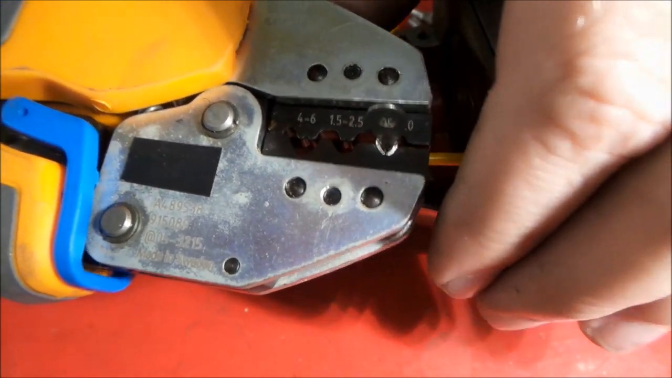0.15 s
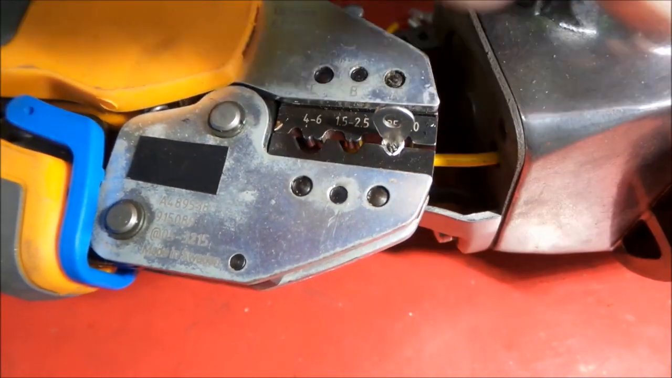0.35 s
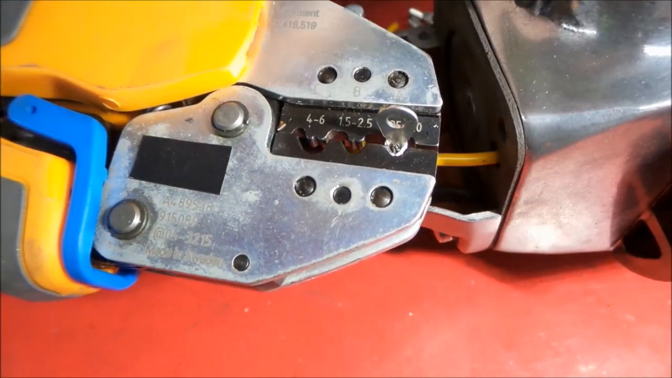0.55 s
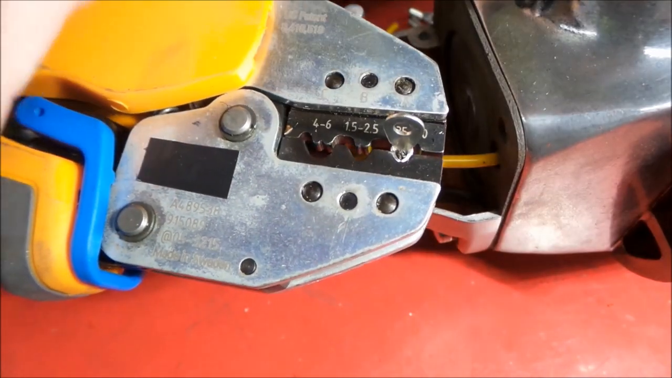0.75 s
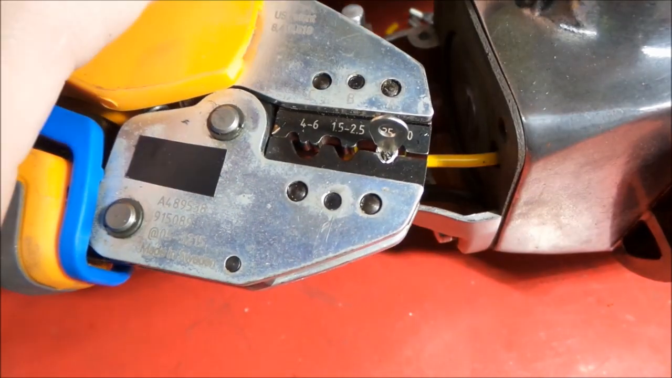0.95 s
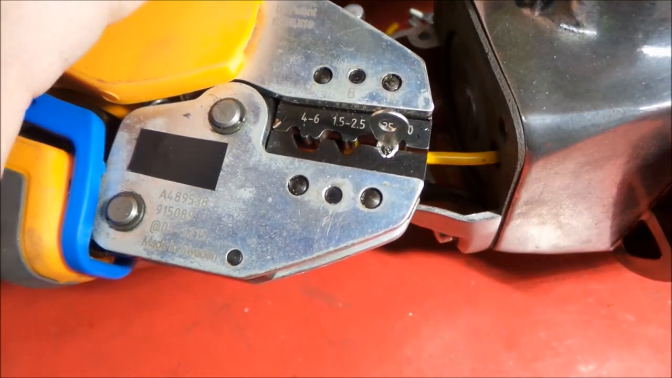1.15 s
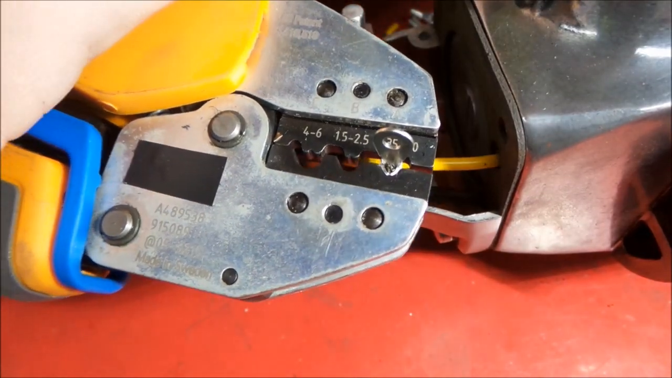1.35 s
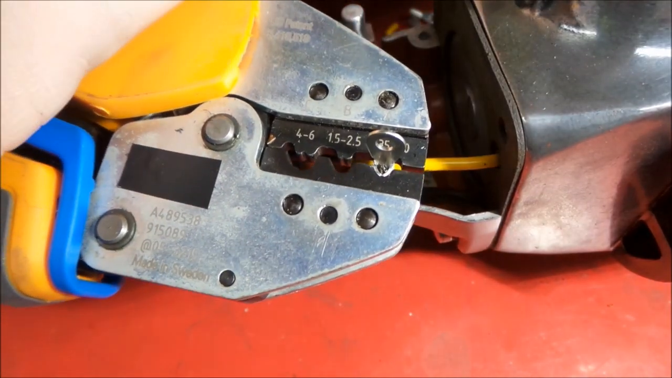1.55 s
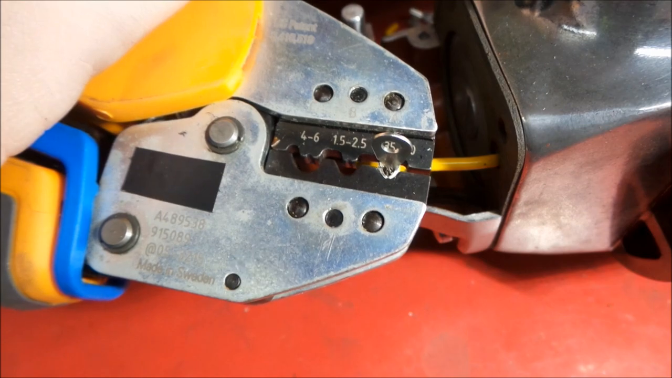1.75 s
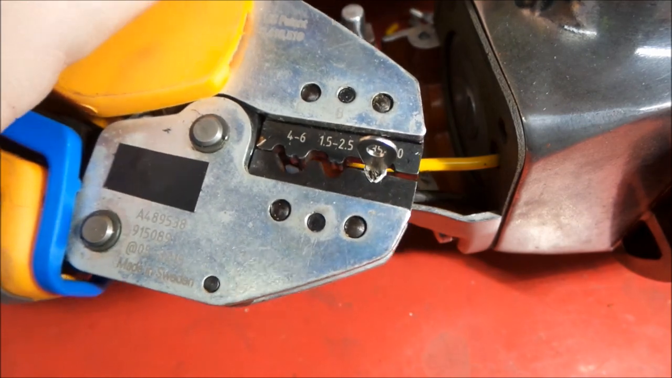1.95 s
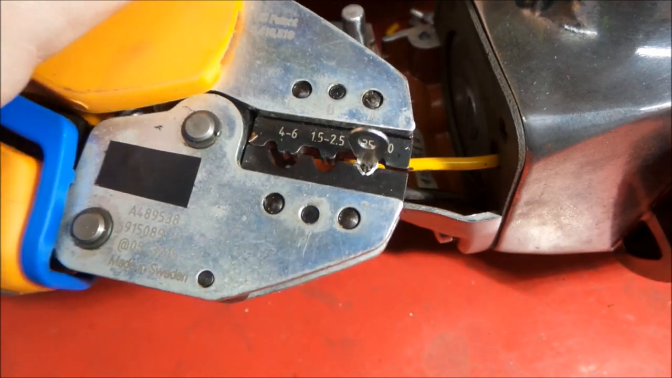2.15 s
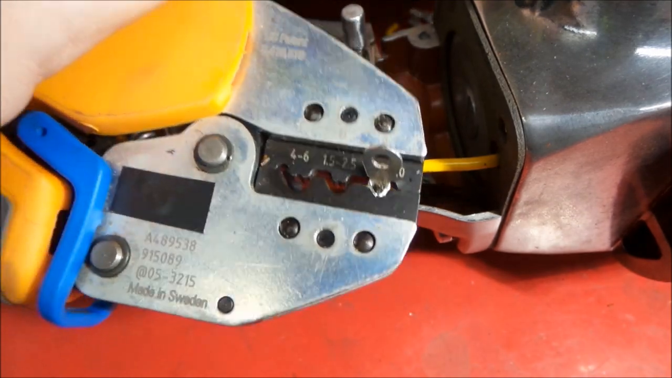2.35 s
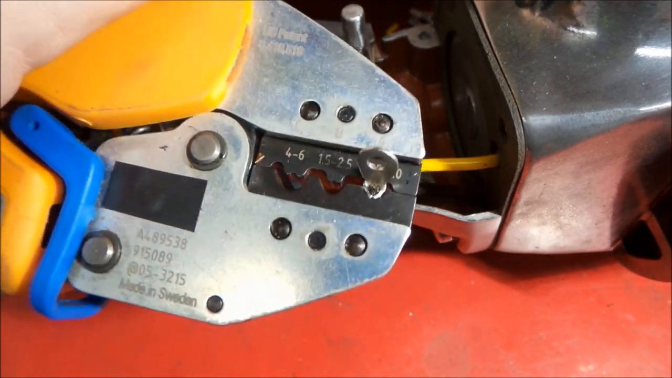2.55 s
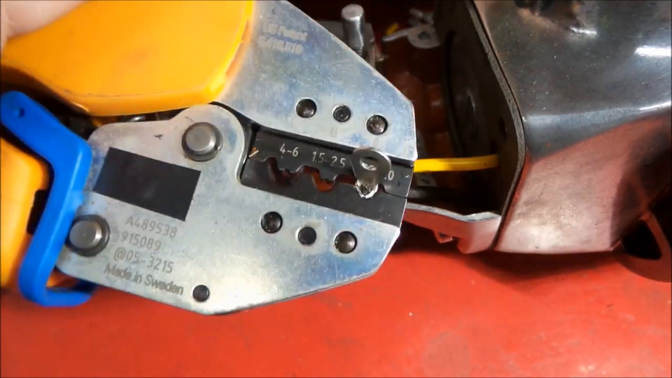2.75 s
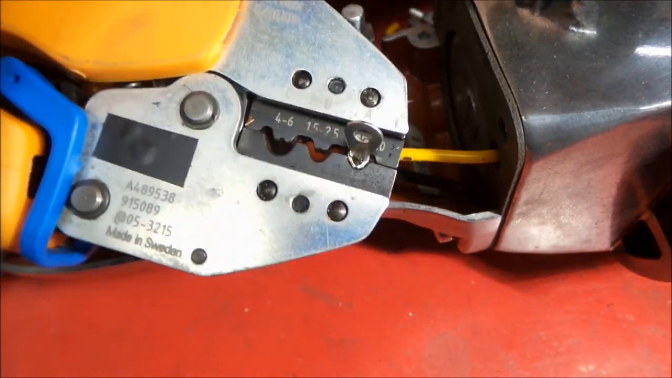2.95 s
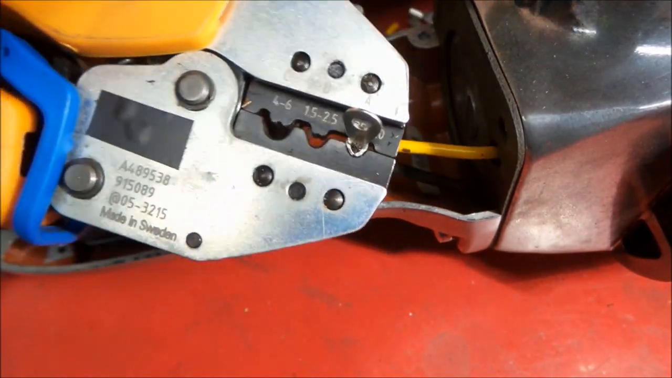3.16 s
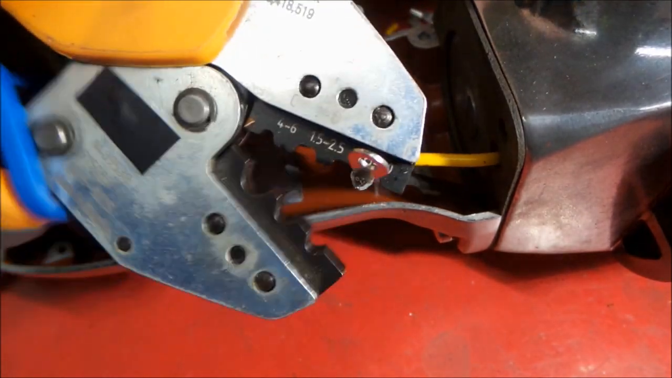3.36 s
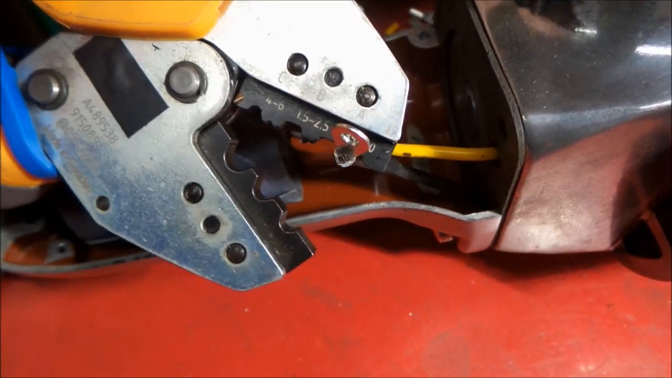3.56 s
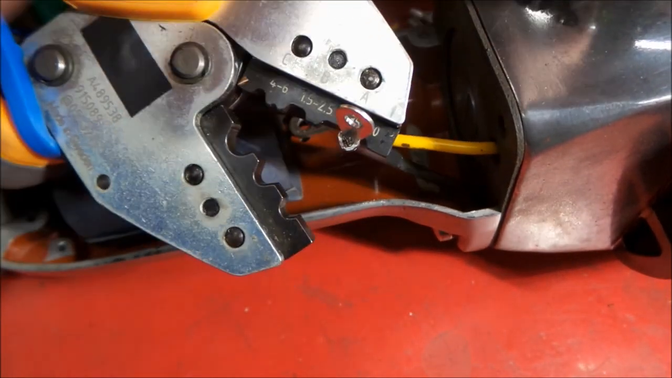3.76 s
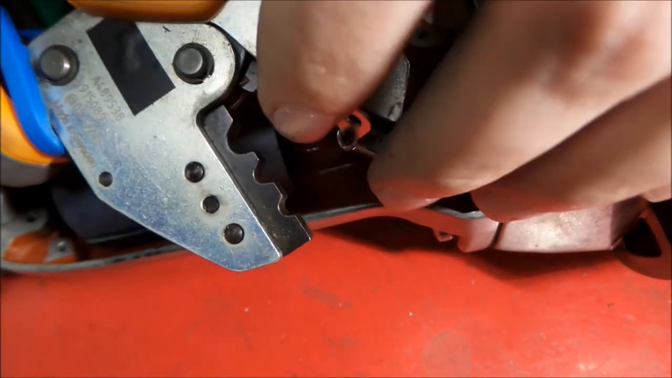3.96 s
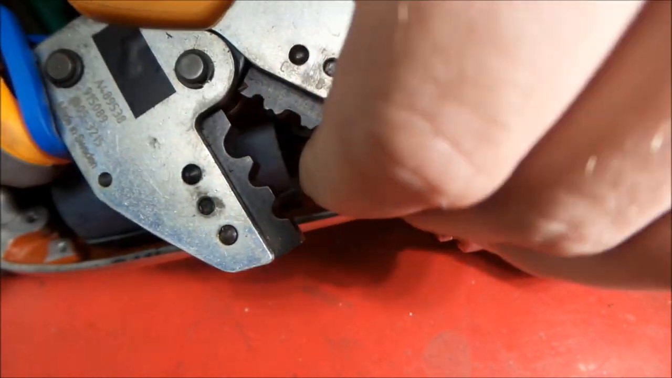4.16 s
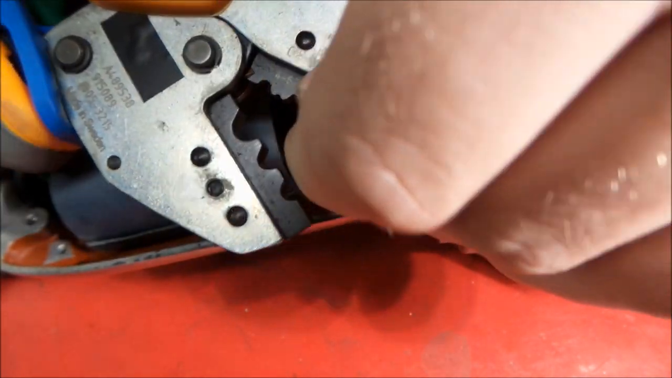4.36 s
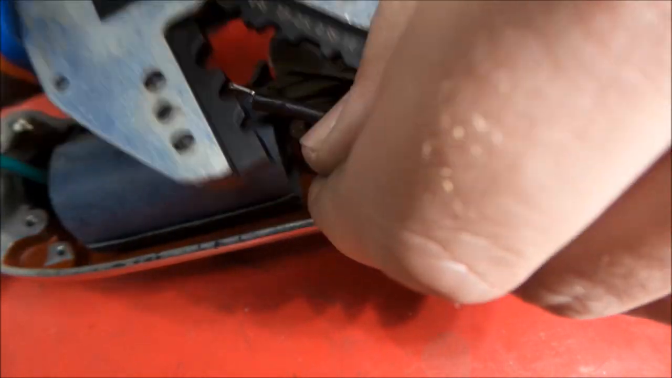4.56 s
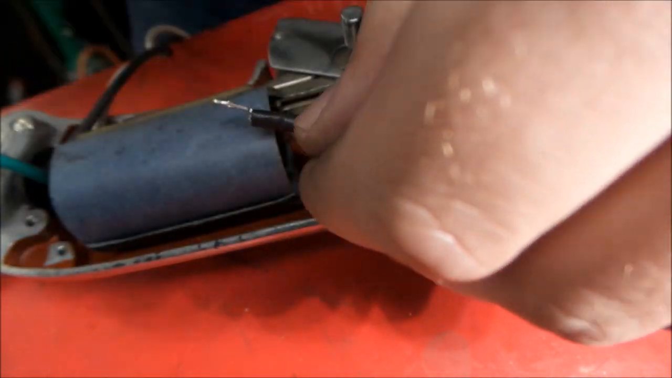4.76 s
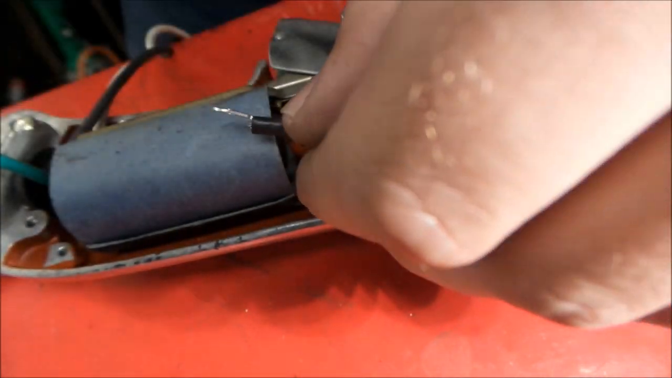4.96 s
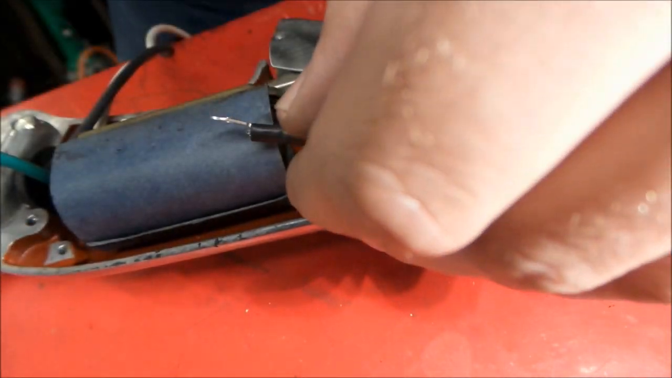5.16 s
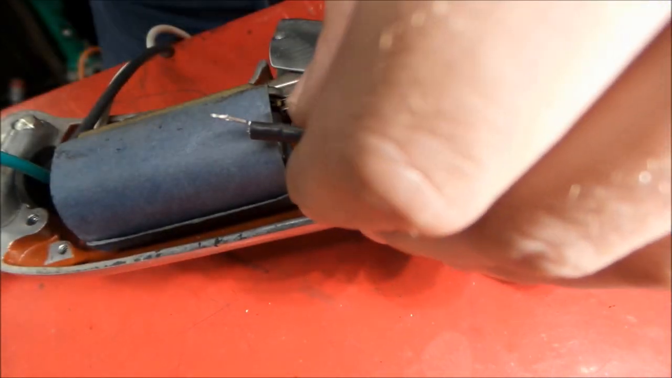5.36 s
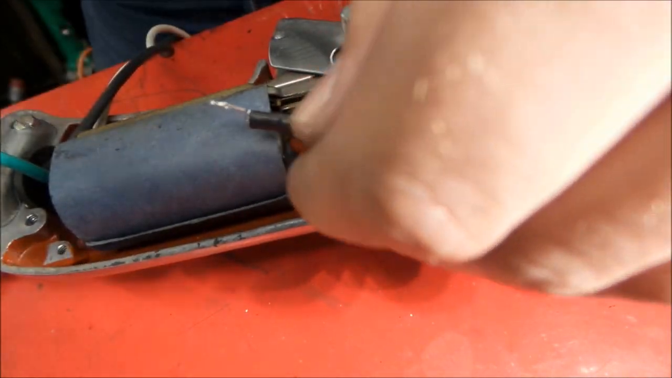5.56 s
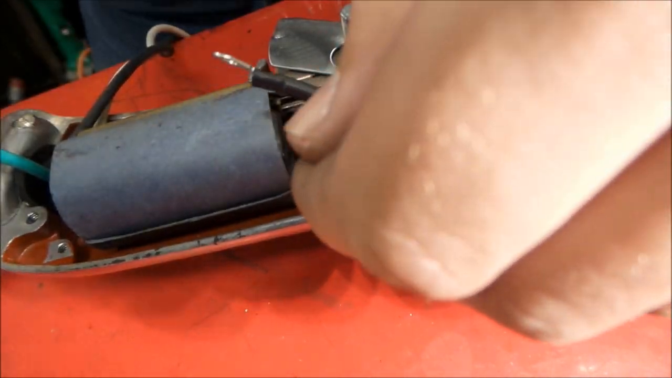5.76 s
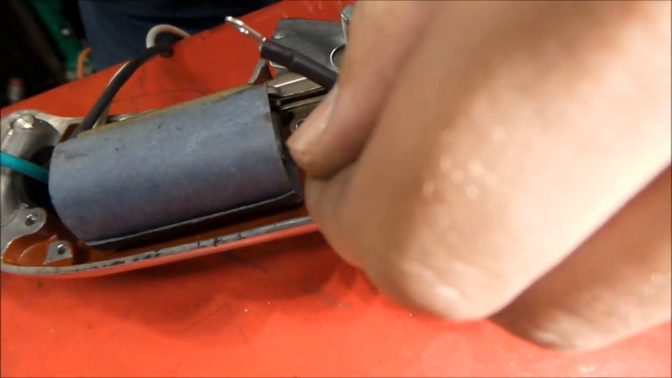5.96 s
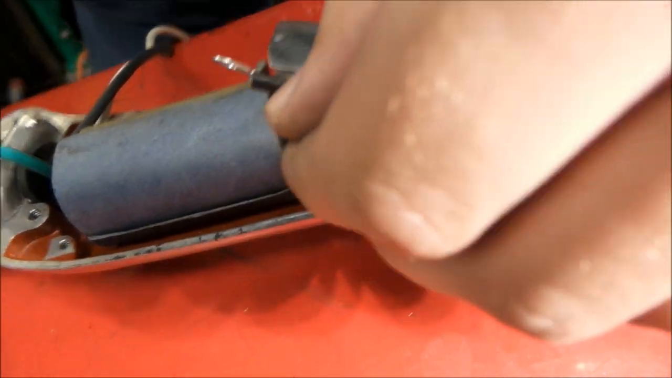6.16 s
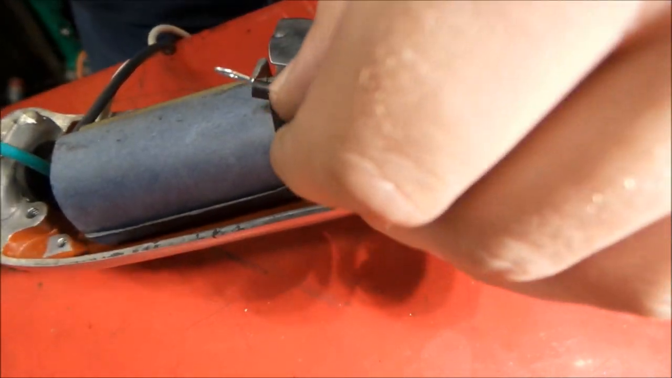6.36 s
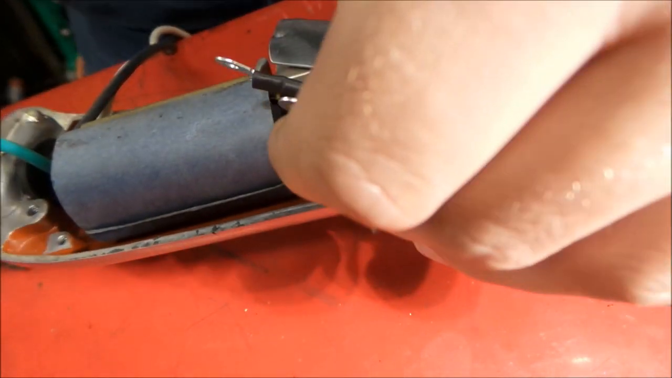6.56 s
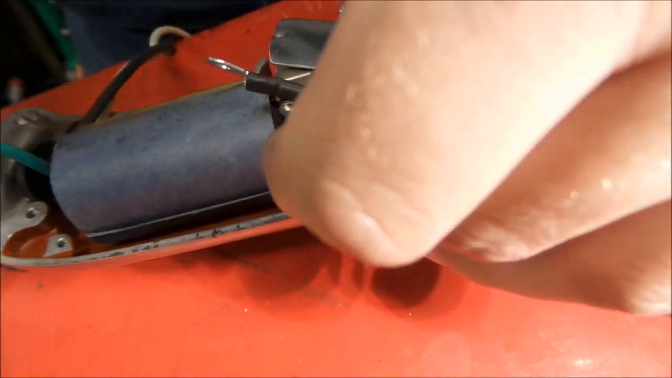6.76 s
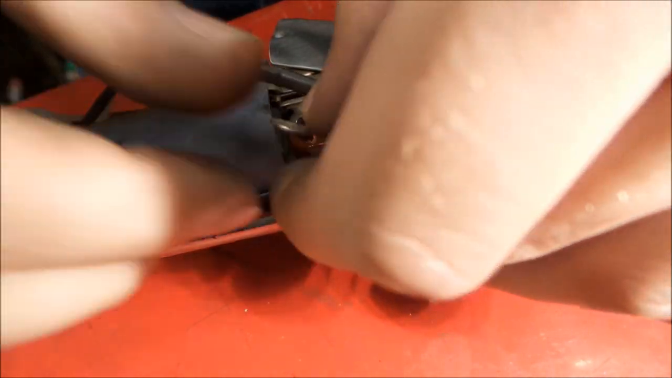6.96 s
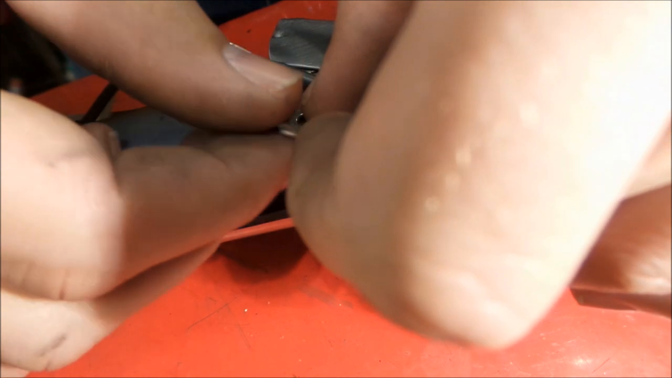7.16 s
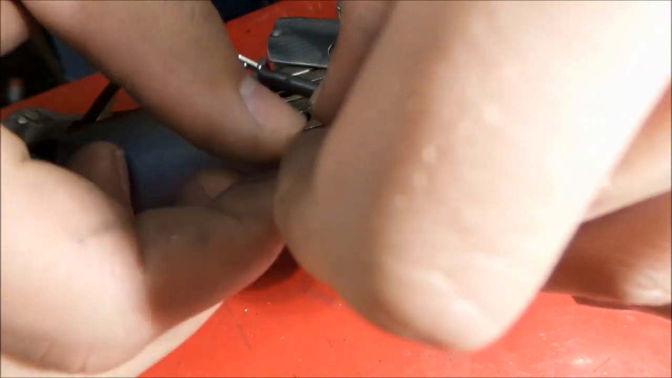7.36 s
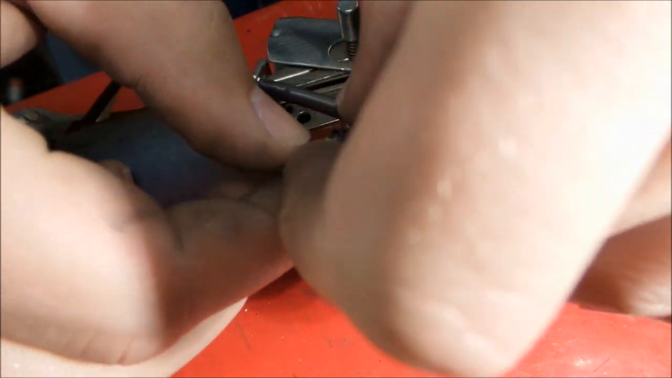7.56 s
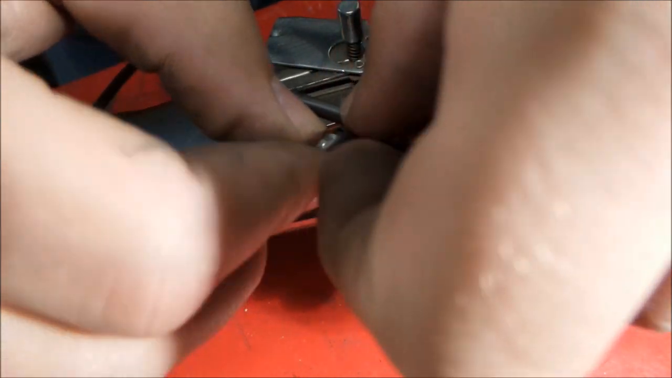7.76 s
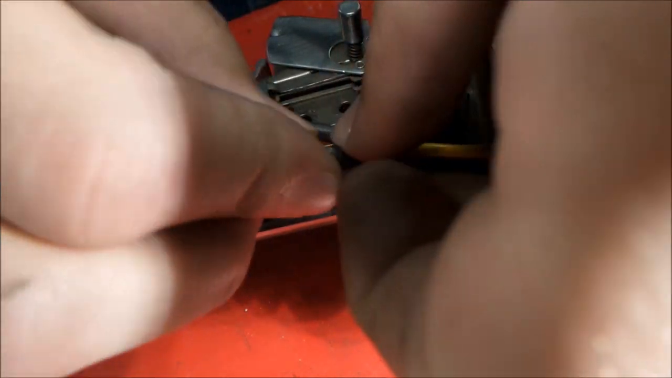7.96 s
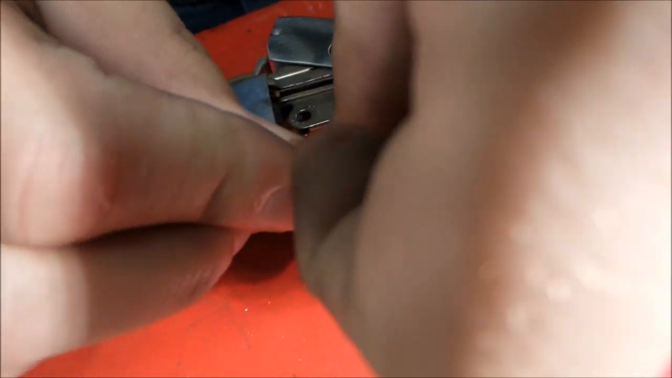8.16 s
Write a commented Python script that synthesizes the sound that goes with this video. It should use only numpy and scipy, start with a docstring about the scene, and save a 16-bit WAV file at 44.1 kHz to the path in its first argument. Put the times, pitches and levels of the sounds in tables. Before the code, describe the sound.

Very close in a small workshop with a faint low hum, a crimping tool gives one sharp snap, then soft skin rubs and tiny ticks. Two loud ratchet snaps follow, and soon the jaws spring open in a rapid run of clicks ending in a metallic clack. Fingers then slide along wire, the tool rattles briefly, a metal housing thumps low, and a connector clinks faintly.

```python
"""A ratcheting crimping tool is squeezed shut on a metal connector, close by, in a small workshop.
The pawl snaps over its last teeth, then the jaws spring open with a quick run of clicks and a clack.
Fingers work the wire into a metal housing, which is bumped and thumps. A machine hums faintly.
Impacts are shaped noise bursts that excite decaying modes and room reflections;
friction is grainy noise and ringing slips; hum, squeals and pips are sine tones."""
import sys
import numpy as np
from scipy import signal
from scipy.fft import rfft, irfft, next_fast_len
from scipy.io import wavfile
from scipy.ndimage import uniform_filter1d, map_coordinates

SR = 44100
rng = np.random.default_rng(int(sys.argv[2]) if len(sys.argv) > 2 else 0)


def master_out(mix):
    """Clip the mix to full scale and print it as 16-bit PCM to the path in sys.argv[1]."""
    frames = np.transpose(np.atleast_2d(mix))
    ceiling = np.clip(frames, -1, 1)
    pcm = np.round(ceiling * 32767).astype(np.int16)
    wavfile.write(sys.argv[1], SR, pcm)


N = 362662  # samples in the scene


def gain_of(db):
    """A level difference in decibels is 20 times the logarithm of an amplitude ratio."""
    return 10 ** (np.asarray(db) / 20)


def evened(x):
    """Normalises the mean power: rms 1."""
    return x / np.sqrt(np.mean(x ** 2) + 1e-20)


def unit(x):
    """Normalises the total energy: sum of squares 1."""
    return x / np.sqrt(np.sum(x ** 2) + 1e-20)


def read(points, hz):
    """Interpolates a spectrum along a logarithmic frequency axis."""
    f, value = np.transpose(points)
    return np.interp(np.log(hz + 1), np.log(f + 1), value)


def add(mix, s, sound):
    """Linear superposition: a sound joins the mix at time s."""
    part = mix[round(s * SR):][:len(sound)]
    part += sound[:len(part)]


def plateau(start, end, attack, release):
    """A trapezoidal envelope: rises from 0 to 1, holds, and falls back."""
    t = np.arange(N) / SR
    return np.clip(np.minimum((t - start) / attack, (end - t) / release), 0, 1)


def noise(colour):
    """Steady coloured noise: a random spectrum weighted by a frequency response, at rms 1."""
    size = next_fast_len(N)
    spectrum = rfft(rng.standard_normal(size))
    weight = gain_of(read(colour, np.fft.rfftfreq(size, 1 / SR)))
    return evened(irfft(spectrum * weight, size)[:N])


def workshop(waver=0.13):
    """Discrete hum lines, phase-modulated in proportion to frequency, over broadband room noise."""
    # air of the workshop: f/Hz, level/dB
    air = [(20, -20), (85, -11), (130, -5.5), (190, 1), (235, 0), (275, -3.5), (360, -5.5), (430, -11),
           (900, -17.5), (1070, -14), (1250, -20), (3500, -28.5), (15500, -32.5), (16200, -55)]
    # hum of a machine: f/Hz, rms level/dB, before the dip
    hum = [(57.5, -60.5), (115, -69), (172.5, -61.5), (230, -69.5), (345, -64.5)]
    t = np.arange(N) / SR
    out = gain_of(-55.5) * noise(air)
    for hz, db in hum:
        drift = np.interp(t, np.linspace(0, t[-1], 40), rng.standard_normal(40))
        phase = 2 * np.pi * (hz * t + rng.random()) + waver * drift * hz / hum[0][0]
        out += gain_of(db) * np.sqrt(2) * np.sin(phase)
    # the background sinks by 5.5 dB for about a second around and after the clack
    dip = plateau(3.43, 4.68, attack=0.035, release=0.35)
    return out * gain_of(-5.5 * dip)


def impulse(colour, tilt, size=4096):
    """A minimum-phase pulse: the Hilbert transform of the log gain supplies the causal phase."""
    hz = abs(np.fft.fftfreq(size, 1 / SR))
    octaves = np.log2(np.maximum(hz, 200) / 1000)  # from 1 kHz; the tilt is held below 200 Hz
    log_gain = np.log(gain_of(read(colour, hz) + tilt * octaves))
    return np.fft.ifft(np.exp(np.conj(signal.hilbert(log_gain)))).real[:size // 2]


def chatter(decay, size=2048):
    """Micro-impacts: a first touch and a dying random flurry, whitened to an even spectrum."""
    t = np.arange(size) / SR
    flurry = unit(rng.standard_normal(size) * np.exp(-t / decay))
    flurry[0] += .25  # the first touch
    z = rfft(flurry)
    smooth_power = uniform_filter1d(abs(z) ** 2, size=41)
    return irfft(z / np.sqrt(smooth_power + 1e-12))[:size * 3 // 4]


def room(x, build_s=0.02128, early=0.62):
    """Reverberation: diffuse reflections thicken at first, while each band decays at its own rate."""
    # reverberation time of the room: f/Hz, t60/s
    room_t60 = [(150, 0.19), (1000, 0.23), (4000, 0.21), (9000, .21), (15000, 0.12)]
    hz, t, z = signal.stft(rng.standard_normal(len(x)), SR, nperseg=256)
    decay = gain_of(-60 * t / read(room_t60, hz)[:, None])
    tail = signal.istft(z * decay, SR, nperseg=256)[1]
    t = np.arange(len(tail)) / SR
    density = np.minimum(early + (1 - early) * t / build_s, 1)
    tail *= density * (t > .002)  # no reflection in the first 2 ms
    return signal.fftconvolve(x, unit(tail))[:len(x)]


def blow(db, decay, tilt, ring_db=0, colour=(), modes=(), wet_db=-12):
    """Modal impact: contact noise, the modes it excites (if any) and its reflections."""
    t = np.arange(SR // 5) / SR
    contact = np.zeros(len(t))
    add(contact, 0, unit(signal.fftconvolve(chatter(decay), impulse(colour, tilt))))
    ring = np.zeros(len(t))
    for hz, mode_db, t60 in modes:
        level = mode_db + tilt * np.log2(hz) - 60 * t / t60
        ring += gain_of(level) * np.cos(2 * np.pi * hz * t)
    ring *= 1 - np.exp(-2 * t / decay)  # the ring builds while the parts touch
    sound = contact + gain_of(ring_db) * unit(ring) + gain_of(wet_db) * room(contact)
    return gain_of(db) * np.sqrt(.003 * SR) * sound  # db: contact energy as an rms over 3 ms


def blows(rows, colour, modes, wet_db):
    """Superposes all the impacts on one part, which share its spectrum and modes."""
    out = np.zeros(N)
    for s, *hit in rows:
        add(out, s, blow(*hit, colour=colour, modes=modes, wet_db=wet_db))
    return out


def ratchet(rebound_s=0.0026, rebound_decay=0.0016, wet_db=-12.0, skip_wet_db=-18.0):
    """Released strain: the loaded pawl lands dead on each tooth; running free it rebounds once."""
    # loaded pawl snapping off a tooth, and at last onto its stop:
    # t/s, level/dB, decay time/s, brightness/(dB per octave), ring/dB
    snaps = [(0.0278, -18, 0.0017, -1, -0.5), (2.356, -15, 0.0024, -0.9, -9.5),
             (2.442, -20.5, 0.0009, -0.5, -15.5), (3.538, -19, 0.0027, -1, -13)]
    # freed pawl skipping back over the teeth as the jaws open:
    # t/s, level/dB, brightness/(dB per octave), rebound relative to first hit/dB
    skips = [(3.454, -22.5, 2.5, -6), (3.4794, -24, 1, -2), (3.4985, -19, 3.5, -10.5),
             (3.5132, -24, 2.5, -2), (3.5254, -23, -0.5, -2)]
    # colour of the pawl contact: f/Hz, level/dB
    pawl_colour = [(100, -42.5), (700, -20), (1400, -20), (2000, -12.5), (3000, -13.5), (5000, -6),
                   (7500, -4), (9500, -2.5), (11500, 2), (12700, -0.5), (14000, 6.5), (15300, 3),
                   (16500, -19.5)]
    # modes of the pawl: f/Hz, level/dB, t60/s
    pawl_modes = [(3560, -9, 0.011), (4750, -10.5, .012), (5500, -5.5, .012), (7240, 9, 0.0052),
                  (8860, -3.5, 0.012), (11450, -2.5, 0.0092), (13500, -0.5, 0.017), (14300, -4.5, 0.012)]
    skip_decay_s, skip_ring_db = 0.00059, -20
    out = blows(snaps, pawl_colour, pawl_modes, wet_db)
    for s, db, tilt, rebound_db in skips:
        hit = blow(db, skip_decay_s, tilt, skip_ring_db, pawl_colour, pawl_modes, skip_wet_db)
        rebound = blow(db + rebound_db, rebound_decay, tilt, colour=pawl_colour, wet_db=skip_wet_db)
        add(out, s, hit)
        add(out, s + rebound_s, rebound)
    return out


def ticks(decay_s=.0016, wet_db=-14.0):
    """Small contacts without modes: distinct ticks, and a jittered scatter from strained parts."""
    # ticks of the jaws, connector and wire: t/s, level/dB, brightness/(dB per octave)
    clear_ticks = [(0.6609, -51.5, 17), (1.2223, -57, 1), (1.4793, -48, 0.5), (1.6107, -52, 13),
                   (1.701, -49, 5), (1.8418, -41.5, 6), (2.125, -48.5, -1.5), (2.208, -46.5, 5),
                   (2.815, -47, 6.5), (2.8872, -44, 4), (2.931, -53, -2), (3.367, -52, 7.5),
                   (4.0811, -60.5, 7), (4.508, -55.5, 4.5), (5.038, -52.5, 3), (5.2434, -49, 1.5),
                   (7.2715, -52, -4), (8.14, -48.5, 4.5)]
    # spells in which the strained parts give off fainter ticks: start t/s, end t/s
    strain_spells = [(1.56, 1.66), (2.79, 3.5), (4.5, 4.6)]
    # colour of a tick: f/Hz, level/dB
    tick_colour = [(100, -29), (1000, -13), (2200, 5), (4000, -0.5), (7000, -1), (10000, -3), (13500, -2.5),
                   (16000, -14.5)]
    ticks_per_s, strain_db, spread_db, strain_tilt = 14, -54, -2.5, 2.5
    rows = [(s, db, decay_s, tilt) for s, db, tilt in clear_ticks]
    for start, end in strain_spells:
        slots = np.arange(start, end, 1 / ticks_per_s)
        for s, (late, strength) in zip(slots, rng.random(size=(16, 2))):
            tick_s = s + .5 * late / ticks_per_s  # within the first half of its slot
            tick_db = strain_db + spread_db * (2 * strength - 1)
            rows.append((tick_s, tick_db, decay_s, strain_tilt))
    return blows(rows, tick_colour, [], wet_db)


def friction(pressure, colour, grain_db):
    """Stick-slip friction: coloured noise whose slow random level makes uneven grains."""
    grip = gain_of(grain_db * evened(uniform_filter1d(rng.standard_normal(N), size=250)))
    return pressure * evened(grip * noise(colour))


def strokes(rows, attack, release, fade_db):
    """Friction follows grip: each stroke takes hold, eases as it travels and lets go."""
    # attack and release are shares of the length; fade_db is the change over the stroke
    t, out = np.arange(N) / SR, np.zeros(N)
    for start, length, db in rows:
        travelled = np.clip((t - start) / length, 0, 1)
        hold = plateau(start, start + length, attack * length, release * length)
        out += gain_of(db + fade_db * travelled) * hold
    return out


def creak(slips_per_s=330, spread_db=3.5):
    """Impulsive excitation: random slips of the skin each ring a few short resonances."""
    # resonances that the slipping skin excites: f/Hz, width/Hz, level/dB
    skin_modes = [(2650, 240, -4), (3200, 250, -1.5), (4050, 280, 2)]
    strength = gain_of(spread_db * np.minimum(rng.exponential(1, N), 3))
    slips = (rng.random(N) < slips_per_s / SR) * strength
    t = np.arange(SR // 50) / SR
    ring = np.zeros(len(t))
    for hz, width, db in skin_modes:
        ring += gain_of(db) * np.exp(-np.pi * width * t) * np.sin(2 * np.pi * hz * t)
    return evened(signal.oaconvolve(slips, ring)[:N])


def hands(creak_db=-3.5):
    """Sliding friction: short creaking rubs, longer smoother slides, and pivots under the squeeze."""
    # short rubs of the fingers on handle and wire: start t/s, length/s, hiss level at the start/dB
    rub_rows = [(.98, 0.072, -62.5), (1.07, 0.056, -66), (1.2, 0.091, -62), (1.41, 0.095, -67.5),
                (4.54, .07, -66.5), (4.74, .08, -51), (7.265, 0.082, -55), (7.47, 0.17, -57.5)]
    # long slides of skin along handle or wire: start t/s, length/s, level at the start/dB
    slide_rows = [(.68, 0.26, -58.5), (2.88, 0.26, -60), (3.05, 0.5, -61.5), (3.4, 0.061, -56.5),
                  (4.9, 0.5, -61.5), (5.33, 0.12, -62.5), (5.3, 0.66, -60.5), (5.8, 0.48, -66),
                  (8, 0.31, -67)]
    # pivots grinding through each squeeze of the handles: start t/s, length/s, level at the start/dB
    squeeze_rows = [(1.75, .65, -66), (2.85, 0.75, -66.5)]
    # colours of rub, slide and grind: f/Hz, level/dB
    rub_colour = [(500, -22), (2000, -9), (2750, 1), (3200, 1), (3750, 1.5), (4400, -6), (5500, -16),
                  (12000, -12), (16000, -17)]
    slide_colour = [(500, -6), (1800, 1.5), (2800, -5), (4500, -4), (6500, -5), (8500, -6), (10000, -6),
                    (13000, -0.5), (16000, -10)]
    grind_colour = [(400, -9), (1300, -8), (1650, 7.5), (1900, -6.5), (2150, 2), (2800, -14), (4600, -5),
                    (7000, -14), (16000, -11)]
    rub_grip = strokes(rub_rows, attack=0.14, release=0.16, fade_db=-9.5)
    slide_grip = strokes(slide_rows, attack=0.32, release=0.32, fade_db=-1)
    squeeze_grip = strokes(squeeze_rows, attack=.3, release=.12, fade_db=-1)
    rubs = gain_of(creak_db) * rub_grip * creak() + friction(rub_grip, rub_colour, grain_db=3.0)
    slides = friction(slide_grip, slide_colour, grain_db=2.0)
    pivots = friction(squeeze_grip, grind_colour, grain_db=1.5)
    return rubs + slides + pivots


def pips(centre_hz=6700, length=0.004, glide=0.42, gap_s=.1):
    """Frequency-swept tone bursts: tiny soft rising chirps, alone or in an even run."""
    # faint high pips: first t/s, number of pips, peak level/dB
    pip_runs = [(1.2695, 1, -55), (2.0702, 1, -54), (4.9685, 1, -49.5), (7.0359, 1, -55), (7.202, 1, -52.5),
                (7.502, 7, -56)]
    out, t = np.zeros(N), np.arange(round(length * SR)) / SR
    for first, count, db in pip_runs:
        for k in range(round(count)):
            pitch = centre_hz * rng.uniform(0.88, 1.1) * (1 + glide * (t / length - .5))
            tone = np.sin(2 * np.pi * np.cumsum(pitch) / SR)
            add(out, first + k * gap_s, gain_of(db) * np.hanning(len(t)) * tone)
    return out


def squeals(waver=.018, bends_per_s=28):
    """Random frequency modulation: a faint, very high tone wanders as it swells and fades."""
    # thin wavering squeals: start t/s, length/s, mean f/Hz, peak level/dB
    squeal_rows = [(1.943, 0.19, 11400, -73), (6.838, 0.4, 11900, -72)]
    out = np.zeros(N)
    for s, length, hz, db in squeal_rows:
        t = np.arange(round(length * SR)) / SR
        bends = map_coordinates(rng.standard_normal(size=32), [t * bends_per_s], mode="mirror")
        tone = np.sin(2 * np.pi * np.cumsum(hz * (1 + waver * bends)) / SR)
        add(out, s, gain_of(db) * signal.windows.tukey(len(t), .5) * tone)
    return out


def frame():
    """Modal impact: blows on the steel frame of the tool excite its lightly damped modes."""
    # blows on the frame: t/s, level/dB, decay time/s, brightness/(dB per octave), ring/dB
    knocks = [(2.4435, -29.5, 0.0029, 5.5, -12), (2.4617, -46, 0.001, 0, 5.5),
              (3.531, -25, 0.0086, -1.5, -15), (3.5338, -20.5, 0.0027, 2, -6), (3.549, -26, 0.011, 5, -13),
              (4.665, -43, 0.006, 4, -14), (4.710, -34.5, 0.004, 3.5, -20),
              (4.7445, -29.5, 0.0028, 1.5, -25), (4.752, -37.5, 0.0034, -0.5, -25),
              (4.7615, -30, 0.003, 1.5, -32), (4.785, -41.5, 0.0043, -3.5, -18),
              (4.810, -42.5, 0.0027, 1.5, -16)]
    # colour of the contact: f/Hz, level/dB
    frame_colour = [(60, -16.5), (180, -9), (330, 4.5), (480, -3), (700, -1.5), (900, 3), (1200, -5.5),
                    (1620, 3), (2600, -4), (4800, -0.5), (6500, -6), (10000, -8.5), (14000, -7),
                    (16500, -38.5)]
    # modes of the frame: f/Hz, level/dB, t60/s
    frame_modes = [(348, -7.5, 0.1), (1604, 9, 0.023), (1716, 12, 0.019), (1670, -7, 0.23),
                   (2870, -12, .12), (4990, -19.5, 0.1), (7030, -12, .13)]
    return blows(knocks, frame_colour, frame_modes, wet_db=-7.5)


def housing():
    """Modal impact: the hand bumps the metal housing, whose low modes make the thump."""
    # bumps of the hand: t/s, level/dB, decay time/s, brightness/(dB per octave), ring/dB
    bumps = [(5.860, -34.5, 0.0094, 4, -14), (5.948, -41, .002, 2, -15), (6.269, -18.5, 0.0024, 0.5, 2.5),
             (6.2775, -25.5, 0.0057, 3, -25), (6.303, -23, 0.0037, -9, -10)]
    # colour of the contact: f/Hz, level/dB
    housing_colour = [(25, -40), (80, -31), (140, 5), (300, 4), (420, -3.5), (510, -8.5), (700, -8),
                      (1100, -15), (1750, -21), (2200, -22.5), (2750, -25.5), (5000, -33), (9000, -42.5),
                      (16000, -53)]
    # modes of the housing: f/Hz, level/dB, t60/s
    housing_modes = [(115, -15, 0.31), (157.4, 4, 0.23), (194, -11, 0.14), (244, -8, 0.14),
                     (272.5, -3, 0.27), (292, -9, 0.12), (388, -5.5, 0.13), (650, -6.5, 0.049),
                     (798, -11, 0.069), (2110, 9.5, 0.013), (2370, 2.5, 0.016), (6560, -0.5, .008)]
    return blows(bumps, housing_colour, housing_modes, wet_db=-7.5)


def connector():
    """Repeated modal impact: the connector skids on its terminal in a rapid run of clinks."""
    # clinks of the skid: t/s, level/dB, decay time/s, brightness/(dB per octave), ring/dB
    clinks = [(7.371, -46.5, 0.0018, 5, -1), (7.376, -40, 0.0026, 2, 1), (7.385, -36, 0.0059, -1, 2.5),
              (7.395, -48, 0.0027, 1.5, 8)]
    # colour of the contact: f/Hz, level/dB
    clink_colour = [(100, -19), (270, -2), (600, -8), (1500, -2.5), (2200, -3), (2800, -3), (3800, -3.5),
                    (7000, -11.5), (10000, -13), (16000, -25)]
    # modes of the connector: f/Hz, level/dB, t60/s
    clink_modes = [(267, -12, 0.13), (970, -11.5, 0.076), (2205, -2, 0.034), (2270, -10, .03),
                   (4680, -21, 0.037), (7060, -8, .012)]
    return blows(clinks, clink_colour, clink_modes, wet_db=-12.5)


def scene():
    """Superposes tool, hands, housing and workshop at one point, alike in both channels."""
    tool = ratchet() + ticks() + frame()
    work = hands() + housing() + connector()
    mono = workshop() + tool + work + pips() + squeals()
    return np.tile(mono, (2, 1))


def record(dry, low_hz=38):
    """Band limiting: the microphone sheds the deep bass, then a low-pass cuts the top treble."""
    highpass = signal.butter(2, low_hz, "highpass", fs=SR, output="sos")
    thinned = signal.sosfilt(highpass, dry)
    lowpass = signal.firwin(255, 16100, window=("kaiser", 8), fs=SR)
    return signal.oaconvolve(thinned, lowpass[None], "same")


dry = scene()
out = record(dry)
master_out(out)
```